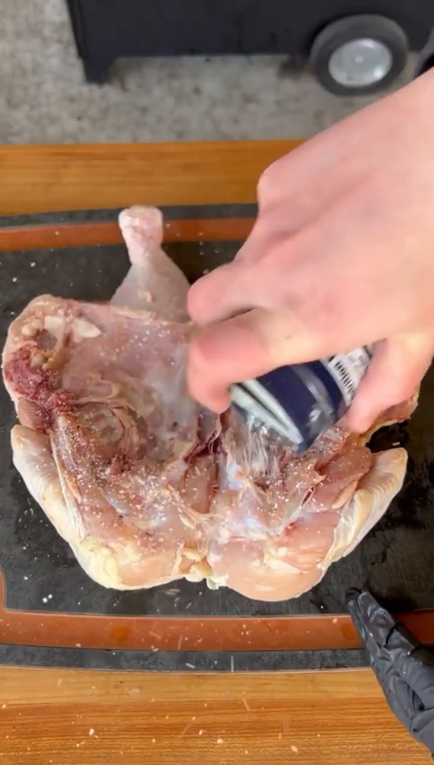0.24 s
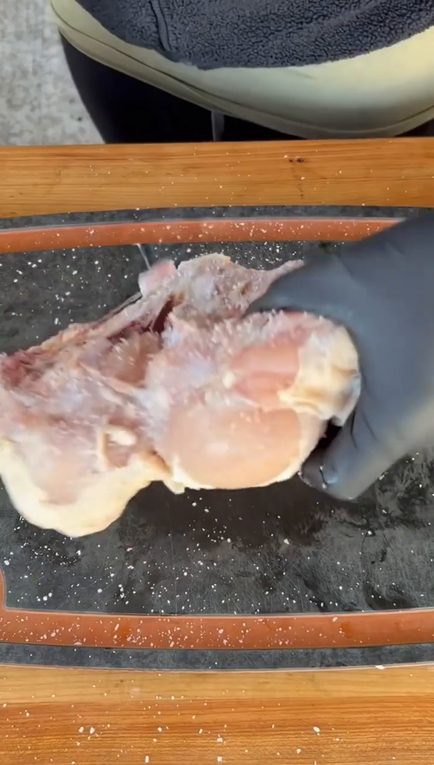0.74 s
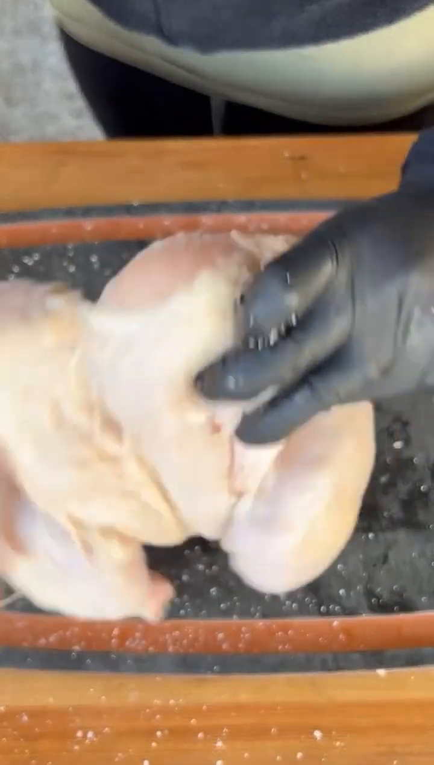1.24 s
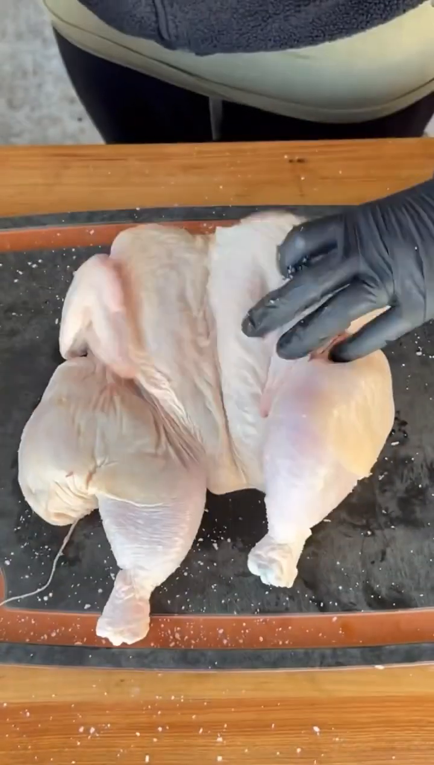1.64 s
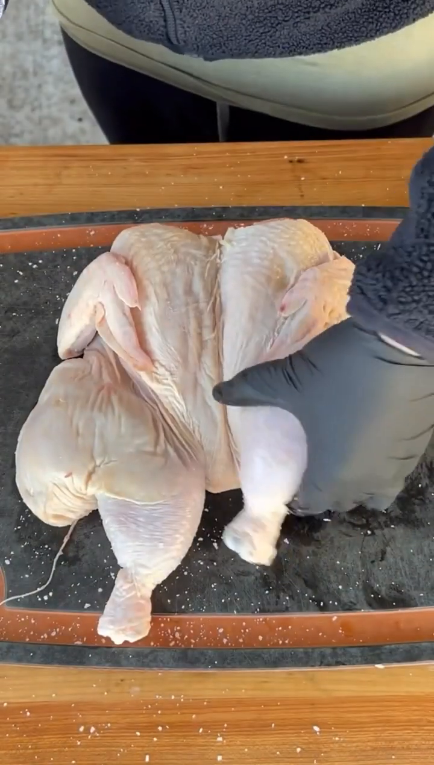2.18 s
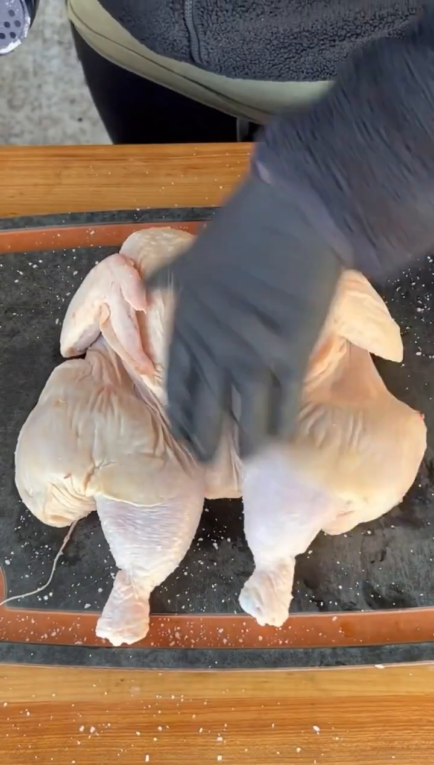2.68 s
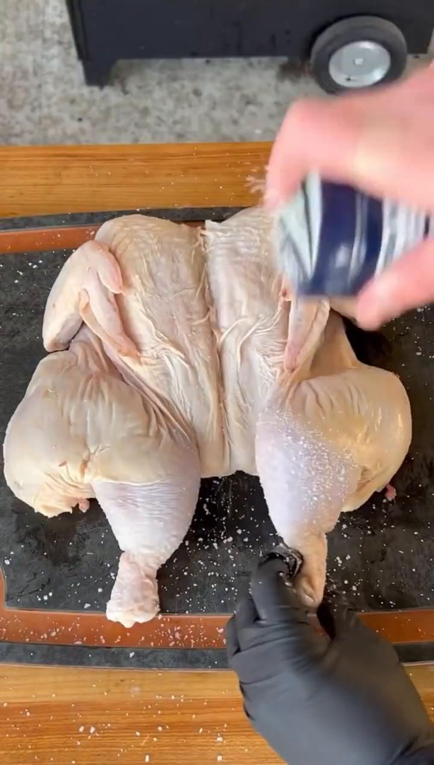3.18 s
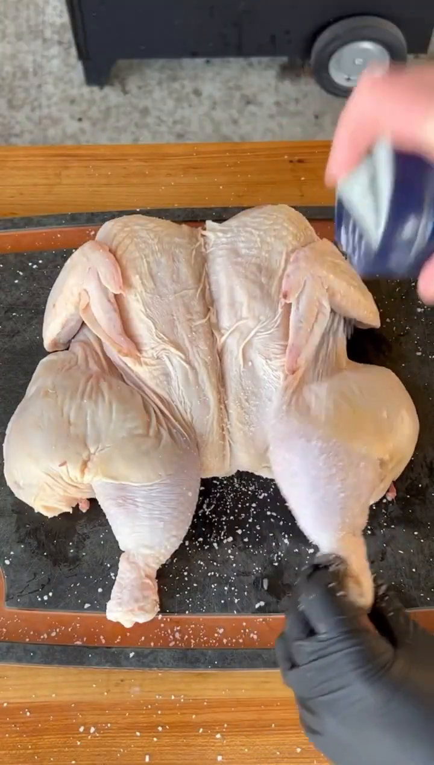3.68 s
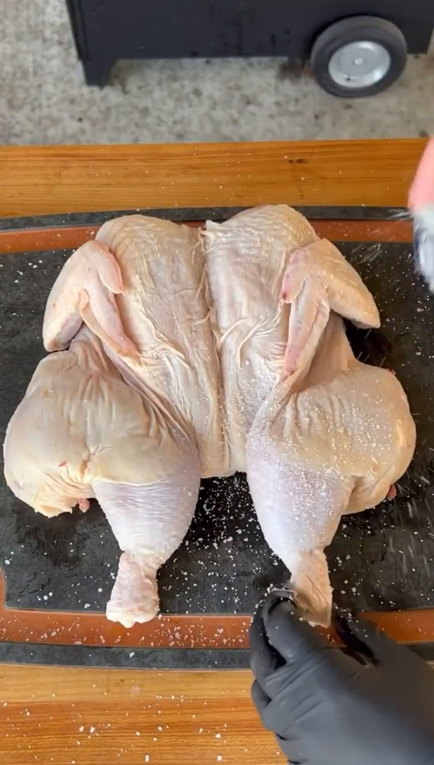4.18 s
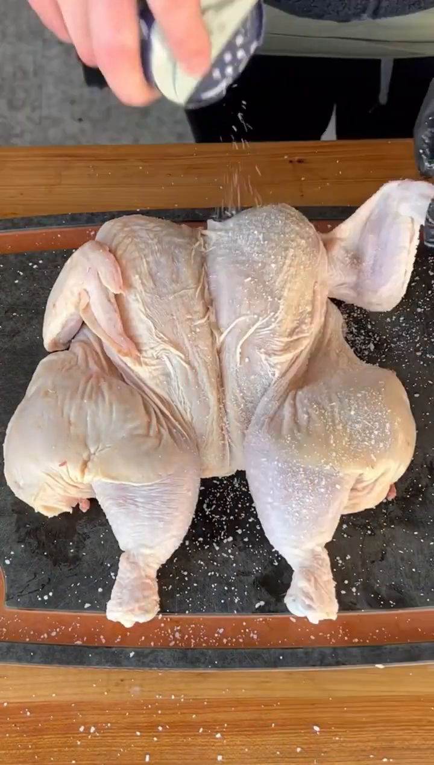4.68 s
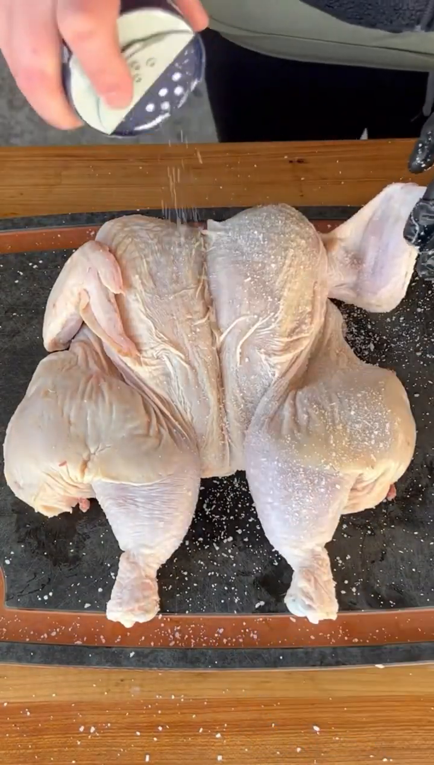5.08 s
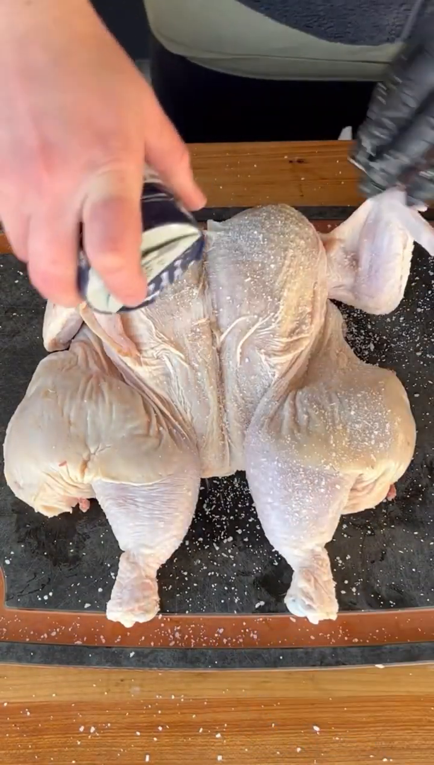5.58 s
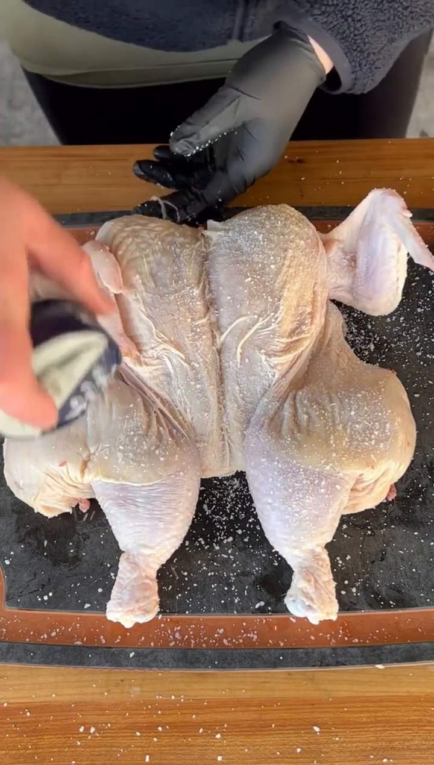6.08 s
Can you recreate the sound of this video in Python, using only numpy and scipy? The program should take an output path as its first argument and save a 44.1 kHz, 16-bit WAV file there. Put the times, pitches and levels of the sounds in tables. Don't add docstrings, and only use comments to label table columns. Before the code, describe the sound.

Brief salt hiss, rubbery handling with sharp joint cracks and a wet slap on the board, then steady salt shakes softening into lighter flicks.

```python
import sys
import numpy as np
from scipy import signal
from scipy.fft import rfft, irfft, next_fast_len
from scipy.io import wavfile
from scipy.ndimage import uniform_filter1d, map_coordinates

SR = 44100
rng = np.random.default_rng(int(sys.argv[2]) if len(sys.argv) > 2 else 0)


def unload_wav(signal):
    wavfile.write(
        sys.argv[1],
        SR,
        np.round(np.clip(np.atleast_2d(signal).T, -1, 1) * 32767).astype(np.int16),
    )


def ratio_of_db(decibels):
    return 10 ** (np.asarray(decibels, float) / 20)


N = 279593

# (throw time [s], throw level [dB], time until return [s], return level [dB],
# stop [ms per 10 dB])
STROKES = [(-0.03, -39, 0.056, -37, 14), (0.166, -36, 0.054, -39, 43), (2.779, -35, 0.098, -43, 27),
           (2.968, -33.5, 0.063, -33.5, 33), (3.169, -30, 0.064, -31, 9), (3.373, -32, 0.059, -32.5, 13),
           (3.575, -33.5, 0.058, -34, 8), (3.773, -33, 0.061, -32, 11), (3.967, -36, 0.046, -38.5, 40),
           (4.173, -33.5, 0.059, -35.5, 13), (4.368, -33, 0.063, -34, 9), (4.564, -33.5, 0.058, -33.5, 23),
           (4.71, -41.5, 0.06, -39.5, 10), (4.902, -38.5, 0.058, -42, 35), (5.099, -37, 0.053, -42, 23),
           (5.293, -38, 0.053, -43.5, 50), (5.492, -37.5, 0.054, -49, 61), (5.69, -39, 0.051, -48, 79),
           (5.871, -45, 0.052, -50, 87), (6.06, -39, 0.049, -48, 52), (6.236, -40.5, 0.057, -51, 44)]
# (from [s], to [s])
SHAKING = [
    (0, .299),
    (2.869, 6.4),
]
# (time [s], peak level [dB])
CLUMPS = [(2.9592, -30), (3.0274, -20.5), (3.1644, -28), (3.1814, -18.5), (3.363, -19), (3.3814, -17),
          (3.568, -19), (3.5834, -34), (3.7663, -27), (4.0124, -22.5), (4.1624, -27), (4.2254, -23),
          (4.3655, -23), (4.4278, -20.5), (4.7094, -31), (4.9014, -26), (4.9694, -39), (5.0933, -28),
          (5.1564, -44), (5.2854, -29), (5.4839, -37), (5.681, -28)]
# (time [s], level [dB], half length [s])
PAUSES = [
    (3.086, -9.5, 0.016),
    (5.052, -7, 0.0098),
]
# (time [s], level [dB], rise [ms per 10 dB], fall [ms per 10 dB])
PATTER = [
    (.28, -60, 12, 15),
    (3.278, -52, 12, 22),
    (3.372, -56, 8, 10),
    (3.468, -53, 12, 18),
    (3.69, -56, 25, 15),
    (3.88, -60, 15, 25),
    (4.27, -59, 15, 25),
    (4.47, -59, 15, 25),
    (4.84, -58, 15, 20),
    (5.0, -63, 15, 20),
]
# (frequency [Hz], density [dB per Hz])
CRYSTALS = [(1760, -30), (2700, -10), (3200, -9.5), (3700, -6), (4660, -3), (6350, -1.5), (7560, 1.5),
            (8600, -2), (10000, -2), (10750, -4.5), (11500, -1.5), (13200, -2.5), (15100, -7.5),
            (16000, -7)]
# (frequency [Hz], width [Hz], level [dB])
DRUM = [(896, 450, -6), (1400, 990, -5.5), (2164, 720, 0.5), (2630, 590, 0.5), (4840, 1040, -3)]
# (from [s], rumble level [dB], air level [dB])
YARD = [
    (0, -57.5, -56),
    (.299, -52, -58),
    (1.0, -52, -57),
    (2.05, -58.5, -60),
    (2.62, -49, -58),
    (2.868, -54.5, -55.5),
    (4.66, -52.5, -54.5),
    (5.7, -51, -53),
]
# (frequency [Hz], density [dB per Hz])
RUMBLE = [(15, -56), (28, -20), (45, 0.5), (70, 8), (100, -5.5), (140, -5.5), (250, -55)]
# (frequency [Hz], density [dB per Hz])
AIR = [(53, -17), (90, -2.5), (234, -11.5), (353, -17.5), (581, -23.5), (804, -25.5), (1290, -28.5),
       (1830, -29.5), (2180, -33.5), (2380, -34.5), (3510, -37.5), (3740, -38.5), (16000, -57)]
# (time [s], frequency [Hz], level [dB])
HUM = [
    [(0, 103, -55.5), (.3, 109, -53.5)],
    [(2.868, 102.3, -45), (3.9, 102, -46.5), (4.1, 103.1, -50), (5.4, 101.6, -52), (6.34, 102.7, -51)],
]
# (middle time [s], half length [s], frequency [Hz], level [dB])
CHIRPS = [
    (1.51, 0.03, 8200, -74),
    (2.645, 0.065, 8100, -70),
    (2.225, .045, 7400, -72),
    (2.82, .025, 7900, -74),
]
# (time [s], peak level [dB], frequency [Hz])
CREASES = [(.584, -44, 1300), (.611, -44, 1250), (.62, -49, 1700), (1.2295, -47, 3500), (1.591, -43, 2330),
           (.03, -43, 600), (.795, -61, 3000), (2.04, -50, 1630), (2.2035, -46, 2500), (2.418, -56, 9000),
           (2.4545, -49, 6100)]
# (time [s], peak level [dB],
# frequency [Hz])
TICKS = [(0.315, -42, 2960), (0.3445, -50, 4540), (0.4932, -44, 5000), (0.545, -43, 1800),
         (0.911, -52, 3000), (1.175, -59, 2250), (1.1963, -41.5, 3300), (1.217, -38.5, 4100),
         (2.2033, -31.5, 10700), (2.281, -61.5, 2760), (1.383, -34, 4250), (1.4007, -40, 4270),
         (1.6726, -32.5, 4170), (1.674, -42, 2200), (3.233, -28.5, 2220), (3.437, -26, 2340),
         (1.9225, -46.5, 700), (.735, -54, 3000), (3.632, -31, 2300), (4.63, -50, 2600)]
# (peak time [s], drag level [dB], rustle level [dB], rise [ms per 10 dB],
# fall [ms per 10 dB])
RUBS = [(0.305, -57.5, -60, 9, 39), (0.5, -65.5, -62.5, 47, 46), (0.543, -50, -62, -2, 17),
        (0.595, -54.5, -67, 49, 67), (0.622, -53.5, -53.5, 39, 0), (1.0, -64, -74, -2, 90),
        (1.092, -67, -64, 36, 90), (1.2, -50.5, -60, 44, 1), (1.26, -59, -58.5, 23, 70),
        (1.307, -48.5, -65, 35, 18), (1.3538, -34.5, -52, 3, 62.5), (1.59, -52, -59.5, 44, 88),
        (1.668, -49, -55.5, 4, 38), (1.896, -79, -63, 36, 10), (1.958, -68, -64.5, 69, 92),
        (2.115, -56.5, -58, 74.5, 62), (2.202, -57.5, -55, 16, 34), (2.28, -52.5, -64, 10, 31),
        (2.34, -52, -51.5, 41, 55), (2.492, -43, -63, 14.5, 62), (2.59, -53, -53, 13, 15),
        (2.808, -85, -65.5, 9, 70)]
# (time [s], level [dB], rise [ms per 10 dB], fall [ms per 10 dB])
SLIDES = [
    (.612, -65, 12, 4),
    (1.26, -59, 10, 30),
    (1.362, -53, 8, 35),
    (1.58, -66, 55, 60),
    (1.895, -68, 15, 15),
    (2.12, -53, 19, 42),
    (2.345, -52.5, 46, 40),
    (2.47, -63, 30, 20),
    (2.59, -56, 20, 15),
    (2.81, -77, 8, 40),
]
# (time [s], level [dB], rise [ms per 10 dB], fall [ms per 10 dB], optional hold [ms])
GRIND = [
    (1.3525, -37, 1, 14, 16),
    (1.62, -62, 40, 28),
    (2.472, -60, 16, 14),
]
# (time [s], level [dB], rise [ms per 10 dB], fall [ms per 10 dB])
KNEAD = [
    (0.38, -39.5, 59, 70),
    (1.91, -63.5, 300, 297),
    (2.47, -63, 200, 199),
    (2.86, -61, 201, 49),
]
# (frequency [Hz], density [dB per Hz])
RUB = [(300, -26), (600, -7), (1000, 3), (1500, -3), (2100, -2), (2900, -4), (4000, -12.5), (6000, -18.5),
       (9000, -77)]
# (frequency [Hz], density [dB per Hz])
RUSTLE = [(2060, -39), (3500, -4.5), (4660, -7), (6820, -6), (7800, -3.5), (9500, -8), (12000, -13.5),
          (16000, -11)]
# (frequency [Hz], density [dB per Hz])
SHEEN = [(6000, -28), (8500, -10), (10500, 4), (12000, 5), (13500, -9), (16000, -3)]
# (frequency [Hz], density [dB per Hz])
TABLE = [(60, -22.5), (110, 2), (170, 5.5), (300, -7), (450, -28), (800, -44)]
# (middle time [s], peak level [dB], frequency [Hz], half length [s])
WOBBLES = [(0.319, -28.5, 89, 0.0084), (0.352, -21, 69, 0.012), (0.386, -17.5, 102, 0.0033),
           (0.403, -41, 70, 0.011), (0.438, -29, 91.5, 0.0058), (0.533, -32.5, 70, 0.0099),
           (0.58, -39, 69.6, 0.0053), (0.736, -36.5, 68, 0.0072), (0.858, -41, 67, 0.0081),
           (1.804, -43, 77, 0.013), (1.93, -31.5, 107, 0.0051), (1.947, -36.5, 88.6, 0.013),
           (2.011, -35, 85.5, 0.0038), (2.051, -40, 80, 0.0033), (2.696, -41, 81.4, 0.0083),
           (1.415, -41, 232, 0.017), (2.49, -36, 318, 0.0029), (2.524, -41.5, 231, 0.032),
           (2.533, -49, 170, 0.021), (5.926, -41, 43.3, 0.027), (6.168, -41, 50.7, 0.023)]
# (middle time [s], peak level [dB], frequency [Hz], half length [s])
BOARD_RINGS = [
    (1.674, -23, 1080, 0.00085),
    (1.678, -38, 970, .0015),
    (1.6875, -35, 1040, 0.0018),
    (1.2, -51, 1000, 0.0018),
    (.615, -47, 1230, .004),
    (.593, -44.5, 950, 0.0018),
]
# (time [s], peak level [dB])
PATS = [
    (0.378, -22),
    (0.428, -35),
    (0.514, -40.5),
    (0.986, -36.5),
    (1.923, -28.5),
    (1.941, -40),
    (1.989, -40),
    (2.485, -22.5),
]
# (time [s], board peak [dB], deep thud peak [dB], snap peak [dB])
SNAPS = [(1.1425, -42, -40, -55), (1.1541, -29, -67, -41.5), (1.158, -34, -38, -53),
         (1.3828, -15.5, -16, -15), (1.3844, -10, -12.5, -15.5), (1.3864, -15.5, -14, -21),
         (1.3917, -26, -26, -33), (1.6705, -46, -46, -29.5), (1.6727, -37, -48, -20.5),
         (1.6765, -35, -50, -45), (1.7005, -51, -57, -53), (1.684, -38, -41, -42), (2.419, -34, -39, -58)]
# (time [s], board peak [dB], deep thud peak [dB], snap peak [dB])
KNOCKS = [(1.4025, -17.5, -36, -15), (1.4065, -21, -41, -24), (1.4115, -21, -25, -31.5),
          (1.4195, -28, -40, -48), (1.4265, -35, -42, -51), (1.4335, -31, -44, -54), (1.583, -65, -62, -48),
          (2.4928, -14, -24.5, -31.5), (2.4962, -19.5, -25, -42), (2.5026, -15.5, -33, -17),
          (2.5075, -22, -33, -40), (2.514, -23, -33, -46), (2.527, -24, -39, -29.5),
          (2.5305, -25.5, -40, -50), (2.5105, -37, -39, -33), (2.538, -40, -51, -49)]
# (time [s], board peak [dB], deep thud peak [dB], snap peak [dB])
SLAPS = [
    (1.274, -45, -41, -54),
    (1.295, -36.5, -39, -61),
    (1.262, -51, -47, -56),
    (1.312, -49, -42, -62),
    (2.483, -43, -16, -38),
    (2.4893, -16.5, -25.5, -16.5),
]
# (frequency [Hz], width [Hz], level [dB])
BOARD_LIFTED = [(990, 118, -1), (1200, 170, -2), (1450, 180, -0.5), (1775, 170, 2.5), (1990, 130, 4),
                (2270, 380, -3.5)]
# (frequency [Hz], width [Hz], level [dB])
FLESH_LIFTED = [(231, 87, -16), (333, 100, -15), (560, 120, -2), (656, 217, 7.5)]
# (frequency [Hz], width [Hz], level [dB])
BONE_LIFTED = [(2810, 300, 12), (3300, 380, 7.5), (3820, 230, 6), (4600, 660, -0.5), (5430, 500, -5)]
# (frequency [Hz], width [Hz], level [dB])
BOARD = [(892, 113, 7), (1176, 174, 1.5), (1420, 380, -3), (2020, 290, -6)]
# (frequency [Hz], width [Hz], level [dB])
FLESH = [(184, 33, -12), (218, 57, -16), (328, 240, -14.5), (533, 36, 5), (736, 40, 2.5)]
# (frequency [Hz], width [Hz], level [dB])
BONE = [(2880, 190, 22.5), (3300, 610, 2.5), (3830, 130, 0), (4580, 840, -5), (5300, 240, -9)]
# (frequency [Hz], time to fall 60 dB [s])
ECHO = [(200, 0.55), (800, 0.17), (3000, 0.047), (10000, 0.21)]
# (frequency [Hz], side over mid [dB])
WIDE = [(60, -15), (130, -19), (300, -12), (640, -3), (1400, -3), (5500, -2), (8500, -5), (12500, -5),
        (15500, -5)]
# (from [Hz], to [Hz])
MONO = [(1580, 5100), (9300, 12800)]
# (from [s], to [s], level [dB])
BREEZE = [
    (.27, 0.464, -3),
    (0.596, 1.015, -3),
    (1.14, 1.206, -4),
    (1.603, 1.91, -4.5),
    (2.113, 2.71, 0.5),
    (2.75, 2.86, 13),
    (5.143, 5.2, -5),
    (5.89, 6.287, -0.5),
]

THROW_RISE_MS, THROW_FALL_MS, THROW_HOLD_MS, THROW_LEADS_MS = 24.4, 25.7, 19.3, 5.6
FLICK_FROM_S, FLICK_RISE_MS, FLICK_HOLD_MS = 5.05, 16.3, 23
RETURN_RISE_MS = 21
TRICKLE_AFTER_S, TRICKLE_DB, TRICKLE_RISE_MS, TRICKLE_FALL_MS = 0.029, -10.5, 24, 66
WALL_THROW_DB, WALL_RETURN_DB, WALL_TRICKLE_DB = -16, -12, -10.5
LATE_WALL_DB = -0.5
CUT_S, CUT_DB, CUT_BACK_S = 4.655, -11.5, 0.032
THROW_SPARKLE_DB, THROW_BODY_DB, REST_SPARKLE_DB = 1, 1, 0.5
CLUMP_DB, CLUMP_LAG_S, CLUMP_RISE_MS, CLUMP_FALL_MS = -13, .003, 3, 10
BASE_HZ, BASE_WIDTH_HZ = 970, 210
TICK_T60_S = 0.019
CREASE_LINGERS = 1.28
RESTING_DB, LIFTED_S = -63, 2
PAT_HZ = 519
SNAP_T60_S, KNOCK_T60_S, SLAP_T60_S = 0.011, 0.013, 0.017
SETTLED_S, HARD_DB = 2, -30
PUSH, PUSH_S, CONTACT_RISE_S = 1.2, 0.000195, 0.00013
BASS_MONO_HZ, TREBLE_HZ, TOP_HZ = 243, 12900, 15880
STARVE_DB, STARVE_S = -21, 0.023


def unit(x):
    return x / np.sqrt(np.mean(x ** 2) + 1e-20)


def along(points, hz):
    f, v = np.transpose(points)
    return np.interp(np.log(hz + 1), np.log(f + 1), v)


def curves(rows):
    s, *cols = np.transpose(rows)
    return [np.interp(np.arange(N) / SR, s, c) for c in cols]


def wobble(rate):
    knots = rng.standard_normal(int(N * rate / SR) + 4)
    return map_coordinates(knots, [np.arange(N) * rate / SR])


def filtered(x, response):
    m = next_fast_len(N + SR // 2)
    return irfft(rfft(x, m) * response(np.fft.rfftfreq(m, 1 / SR)), m)[..., :N]


def modes(table):
    def response(f):
        return sum((-1) ** k * ratio_of_db(db) * 1j * f * w / (c * c - f * f + 1j * f * w)
                   for k, (c, w, db) in enumerate(table))
    return response


def coloured(points):
    return lambda hz: ratio_of_db(along(points, hz))


def grains(rate, spread_db, patchy_db):
    size = (rng.random(N) < rate / SR) * ratio_of_db(spread_db * np.clip(rng.exponential(size=N), 0, 3))
    z = signal.stft(size * rng.standard_normal((2, N)), nperseg=256)[2]
    field = uniform_filter1d(rng.standard_normal(z.shape[1:]), 3, axis=0)
    field = uniform_filter1d(field, 11, axis=1)
    return signal.istft(z * ratio_of_db(patchy_db * unit(field)), nperseg=256)[1][:, :N]


def spread(pair, response, wide_db):
    def wide(hz):
        mono = sum((hz > a) & (hz < b) for a, b in MONO)
        return ratio_of_db(along(WIDE, hz) + wide_db) * (1 - mono)
    mid, side = filtered(pair, lambda hz: response(hz) * [1 + 0 * hz, wide(hz)])
    return np.array([mid + side, mid - side]) / np.std(mid)


def swells(rows):
    t = np.arange(0, N, 100) / SR
    power = 0
    for s, db, rise, fall, *hold in rows:
        before = (s - t) / max(rise, 1)
        after = np.clip(t - s - sum(hold) / 1e3, 0, None) / max(fall, 1)
        fade_db = 9440.0 * np.where(t < s, before, after)
        rounded_db = np.sqrt(fade_db ** 2 + 3.3 ** 2) - 1.5
        power = power + ratio_of_db(db - rounded_db) ** 2
    return np.interp(np.arange(N) / SR, t, np.sqrt(power))


def shakes():
    rows = []
    for s, db, turn, back_db, stop in STROKES:
        shape = (THROW_RISE_MS, THROW_FALL_MS, THROW_HOLD_MS)
        if s > FLICK_FROM_S:
            shape = (FLICK_RISE_MS, THROW_FALL_MS, FLICK_HOLD_MS)
        back = s + turn
        rows += [(s - THROW_LEADS_MS / 1e3, db - 2.0, *shape, WALL_THROW_DB),
                 (back, back_db, RETURN_RISE_MS, stop, 0, WALL_RETURN_DB),
                 (back + TRICKLE_AFTER_S, back_db + TRICKLE_DB, TRICKLE_RISE_MS, TRICKLE_FALL_MS, 0,
                  WALL_TRICKLE_DB)]
    return rows


def salt():
    t = np.arange(N) / SR
    rows = shakes()
    clumps = [(s + CLUMP_LAG_S, db + CLUMP_DB, CLUMP_RISE_MS, CLUMP_FALL_MS) for s, db in CLUMPS]
    hiss = swells([row[:-1] for row in rows] + clumps)
    thrown = (swells([row[:-1] for row in rows[::3]]) / hiss) ** 2
    wall = swells([(s, db + wall_db, *shape) for s, db, *shape, wall_db in rows])
    wall = wall * ratio_of_db(LATE_WALL_DB * (t > CUT_S))

    gate = sum((t >= a) & (t < b) for a, b in SHAKING)
    gate = gate * ratio_of_db(CUT_DB * (t > CUT_S) * np.clip(1 - (t - CUT_S) / CUT_BACK_S, 0, 1))
    gate = gate * ratio_of_db(sum(db * np.exp(-.5 * ((t - s) / half) ** 2) for s, db, half in PAUSES))

    fine = spread(grains(20000, spread_db=1.2, patchy_db=1.2), coloured(CRYSTALS), wide_db=0)
    sparkle = filtered(fine, lambda hz: 1 / (1 + (9500 / (hz + 1)) ** 8))
    body = filtered(fine, lambda hz: 1 / (1 + (hz / 4200) ** 8))
    sparkle_db = thrown * THROW_SPARKLE_DB + (1 - thrown) * REST_SPARKLE_DB + 0.81 * wobble(15)
    sparkle_gain = (hiss / ratio_of_db(-39.0)) ** 0.22 * ratio_of_db(sparkle_db)
    fine = fine + sparkle * (sparkle_gain - 1) + body * (ratio_of_db(thrown * THROW_BODY_DB) - 1)

    drum = spread(grains(6000, spread_db=1.5, patchy_db=3), modes(DRUM), wide_db=-3)
    base_modes = modes([(BASE_HZ, BASE_WIDTH_HZ, 0)])
    patter = spread(grains(3000, spread_db=0.5, patchy_db=4.5), base_modes, wide_db=-17)
    base = swells(PATTER) * patter
    return gate * ratio_of_db(1.13 * wobble(90)) * (hiss * fine + wall * ratio_of_db(3.5) * drum + base)


def yard():
    t = np.arange(N) / SR
    start, *levels = np.transpose(YARD)
    now = np.clip(np.searchsorted(start, t) - 1, 0, None)
    rumble_db, air_db = np.array(levels)[:, now]
    rumble = spread(rng.standard_normal((2, N)), coloured(RUMBLE), wide_db=3.0)
    rumble = ratio_of_db(rumble_db + 3.1 * wobble(12)) * rumble
    air = spread(rng.standard_normal((2, N)), coloured(AIR), wide_db=0)
    air = ratio_of_db(air_db + 3 + .7 * wobble(9)) * air
    hum = 0
    for rows in HUM:
        hz, db = curves(rows)
        on = (t >= rows[0][0]) & (t < rows[-1][0])
        tone = np.sin(2 * np.pi * np.cumsum(hz) / SR)
        hum = hum + on * np.sqrt(2) * ratio_of_db(db + 0.62 * wobble(6.8)) * tone
    insect = 0
    for s, half, hz, db in CHIRPS:
        level = ratio_of_db(db + 2.2 * wobble(130) - 3.2 * ((t - s) / half) ** 4)
        insect = insect + level * np.sin(2 * np.pi * hz * t + 1.4 * wobble(320))
    return rumble + air + hum + insect


def ticks(rows):
    t = np.arange(SR // 20) / SR
    out = np.zeros(N + SR)
    for s, db, hz in rows:
        band = signal.butter(1, [hz / 1.4, min(hz * 1.4, 16000)], "bandpass", fs=SR)
        puff = signal.lfilter(*band, rng.standard_normal(len(t))) * ratio_of_db(-60 * t / TICK_T60_S)
        out[round(s * SR):][:len(t)] += ratio_of_db(db) * puff / np.abs(puff).max()
    return out[:N]


def hands():
    t = np.arange(N) / SR
    gate = (t > SHAKING[0][1]) & (t < SHAKING[1][0])
    rub = spread(grains(7000, spread_db=1.5, patchy_db=2.5), coloured(RUB), wide_db=-6)
    rub = swells([(s, db, rise, fall) for s, db, _, rise, fall in RUBS]) * rub
    rustle = spread(grains(9000, spread_db=3.5, patchy_db=4.5), coloured(RUSTLE), wide_db=0.0)
    rustle = swells([(s, db, rise, CREASE_LINGERS * fall) for s, _, db, rise, fall in RUBS]) * rustle
    sheen = spread(grains(9000, spread_db=-4.0, patchy_db=1.2), coloured(SHEEN), wide_db=0.1)
    sheen = swells(SLIDES) * sheen
    grind = swells(GRIND) * unit(filtered(rng.standard_normal(N), modes(BONE[:2])))
    weight = np.hypot(swells(KNEAD), ratio_of_db(RESTING_DB) * (t < LIFTED_S))
    table = spread(rng.standard_normal((2, N)), coloured(TABLE), wide_db=-17.0)
    knead = weight * ratio_of_db(-2.5 + 6.5 * wobble(30.26)) * table
    return gate * (ratio_of_db(1.2 * wobble(70)) * (rub + rustle + sheen + grind) + knead)


def thumps():
    out = np.zeros(N)
    u = np.arange(-SR // 8, SR // 8) / SR
    for s, db, hz, half in WOBBLES + BOARD_RINGS:
        pulse = np.cos(2 * np.pi * hz * u) * np.exp(-.5 * (u / half) ** 2)
        out[round(s * SR) - SR // 8 - 1:][:len(u)] += ratio_of_db(db) * pulse
    u = np.arange(SR // 4) / SR
    turns = PAT_HZ * 0.01198 * np.log(1 + u / 0.01172)
    for s, db in PATS:
        level = ratio_of_db(db - 60 * u / 0.072) * (1 - np.exp(-u / 0.005))
        out[round(s * SR):][:len(u)] += level * np.sin(2 * np.pi * turns)
    return out


def cracks():
    t = np.arange(SR // 4) / SR
    f = np.fft.rfftfreq(len(t), 1 / SR)

    def soft(top_hz):
        return 1 / (1 + 1j * f / top_hz) ** 2

    def body(board, flesh, bone):
        firm = (1 - 1 / (1 + 1j * f / 1800)) ** 2 * soft(4700)
        return np.array([modes(board)(f) * soft(2500), modes(flesh)(f) * soft(1050), modes(bone)(f) * firm])

    lifted = body(BOARD_LIFTED, FLESH_LIFTED, BONE_LIFTED)
    settled = body(BOARD, FLESH, BONE)
    push_width = PUSH_S * np.array([[1], [1], [.15]])
    push = PUSH * np.exp(-.5 * ((t - 2 * PUSH_S) / push_width) ** 2)
    out = np.zeros(N + SR)
    kinds = [(SNAPS, SNAP_T60_S), (KNOCKS, KNOCK_T60_S), (SLAPS, SLAP_T60_S)]
    for s, *peak_db, t60 in sorted((*row, t60) for rows, t60 in kinds for row in rows):
        burst = rng.standard_normal((3, len(t))) * ratio_of_db(-60 * t / np.clip(t60, .002, .02))
        burst = burst * (1 - np.exp(-t / CONTACT_RISE_S))
        burst = burst + push * (peak_db[2] > HARD_DB)
        rings = irfft(rfft(burst) * (settled if s > SETTLED_S else lifted), len(t))
        rings[0] *= ratio_of_db(-60 * t / (6 * max(t60, .002)))
        out[round(s * SR):][:len(t)] += ratio_of_db(peak_db) / np.abs(rings).max(axis=1) @ rings
    return out[:N]


def shelter(x):
    hz, t, z = signal.stft(rng.standard_normal((2, SR // 3)), SR, nperseg=256)
    decay = ratio_of_db(-60 * t / along(ECHO, hz)[:, None])
    mid, side = signal.istft(z * decay, SR, nperseg=256)[1]
    tail = np.array([mid + 0.31 * side, mid - 0.32 * side])
    late = np.pad(x, (200, 0))[None]
    return signal.fftconvolve(late, tail / np.linalg.norm(mid), axes=1)[:, :N]


def scene():
    bird = cracks() + ticks(TICKS)
    low = thumps()
    table = np.array([np.roll(low, shift=-1), np.roll(low, shift=1)])
    edge = filtered(bird, modes([(1300, 330, -9)]))
    direct = bird * ratio_of_db([[.3], [-.3]]) + np.roll(edge, shift=90) * [[1], [-1]]
    echo = ratio_of_db(-12.0) * shelter(bird)
    return salt() + yard() + ticks(CREASES) + hands() + table + direct + echo


def low_pass(x):
    return signal.sosfilt(signal.butter(12, 16680, fs=SR, output="sos"), x)


def record(dry):
    t = np.arange(N) / SR
    mid, side = (dry[0] + dry[1]) / 2, (dry[0] - dry[1]) / 2
    puffs = uniform_filter1d(sum(ratio_of_db(db) * (t > a) * (t < b) for a, b, db in BREEZE), size=600)
    side = side + (puffs - 1) * filtered(side, lambda hz: 1 / (1 + (hz / BASS_MONO_HZ) ** 8))
    pair = np.array([mid + side, mid - side])
    middle_band = mid - uniform_filter1d(mid, size=70) - np.diff(mid, prepend=0)
    blow = np.abs(uniform_filter1d(middle_band ** 2, size=round(STARVE_S * SR)))
    starved = blow / (blow + ratio_of_db(STARVE_DB) ** 2)
    pair = pair - starved * filtered(pair, lambda hz: hz > TREBLE_HZ)
    return low_pass(filtered(pair, lambda hz: hz < TOP_HZ))


dry = scene()
out = record(dry)
unload_wav(out)
```